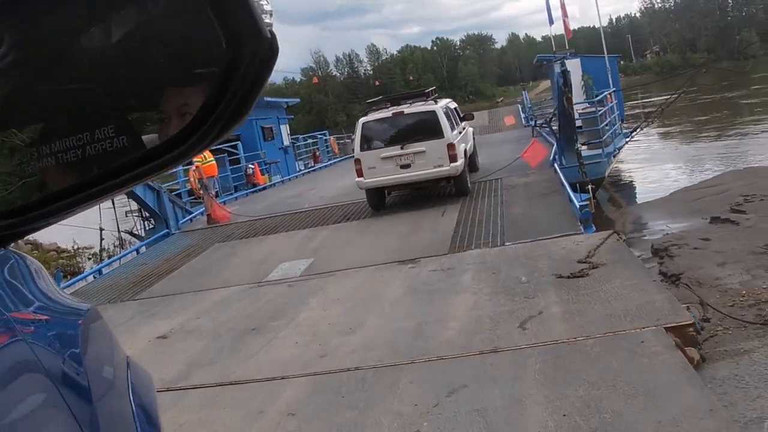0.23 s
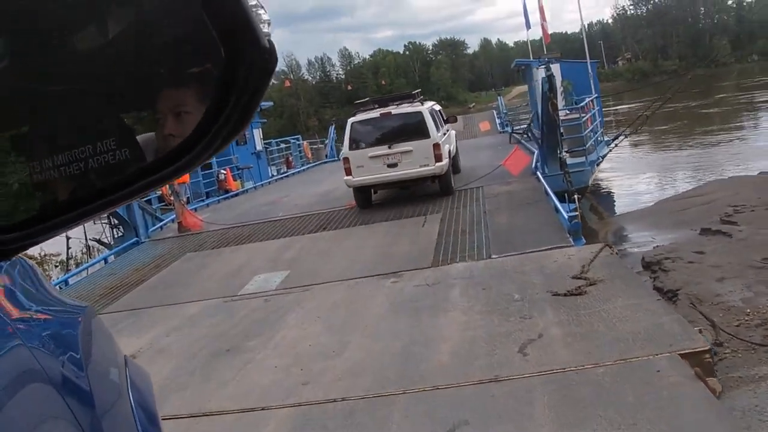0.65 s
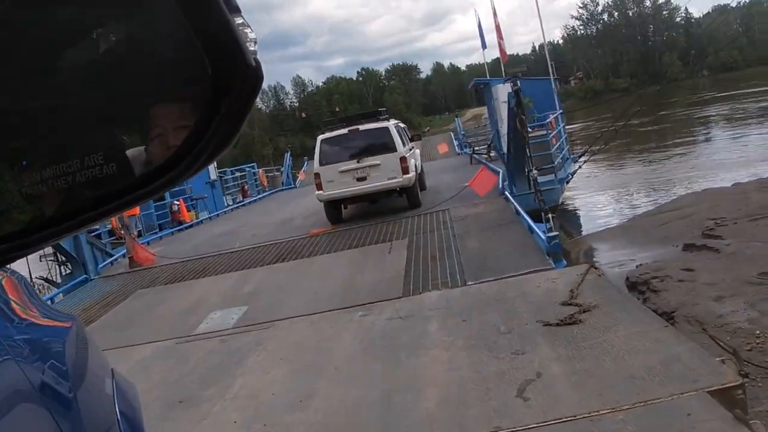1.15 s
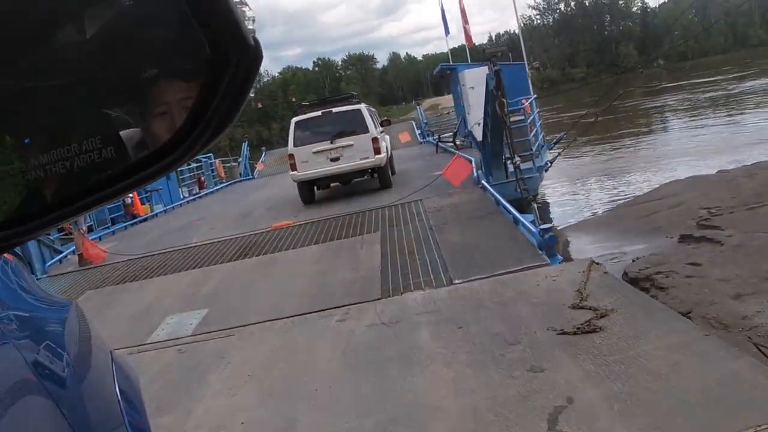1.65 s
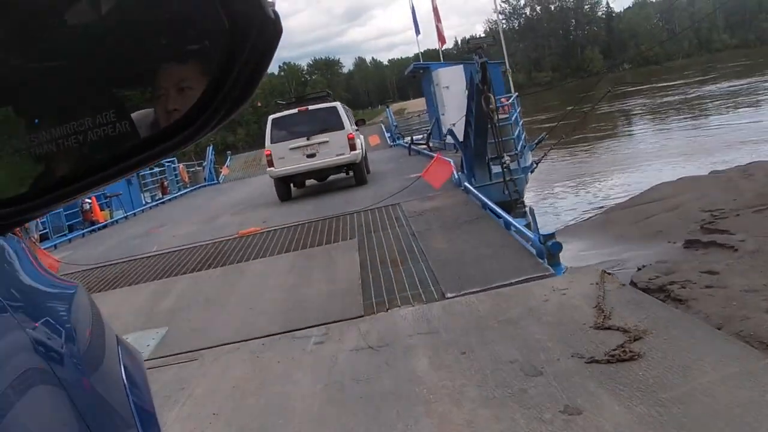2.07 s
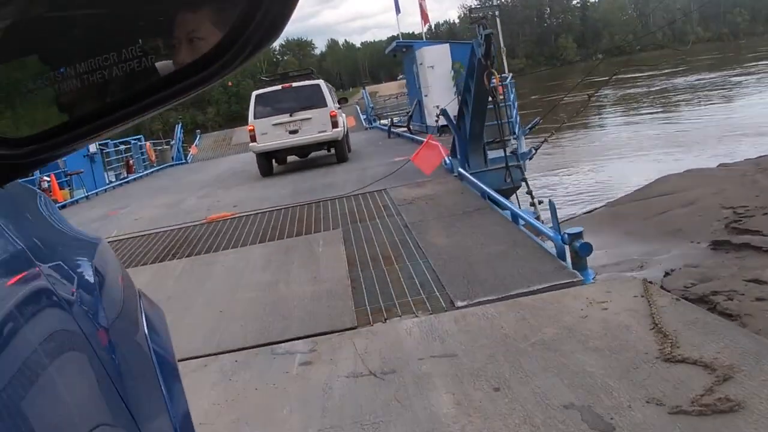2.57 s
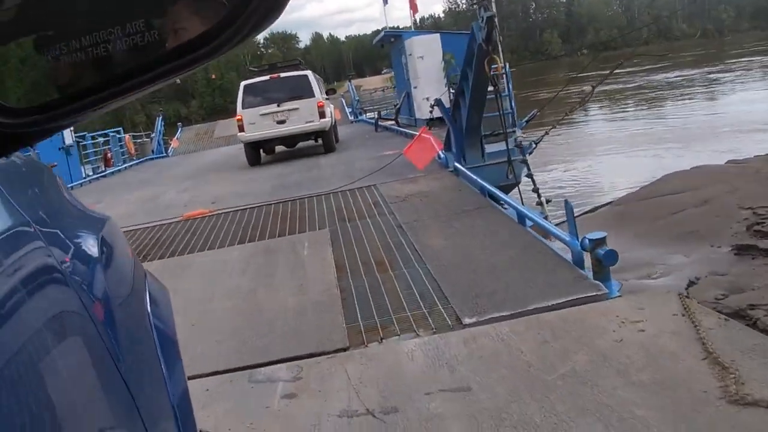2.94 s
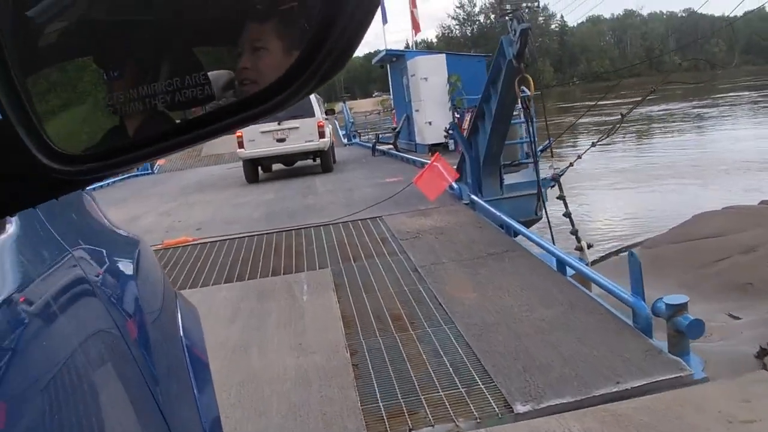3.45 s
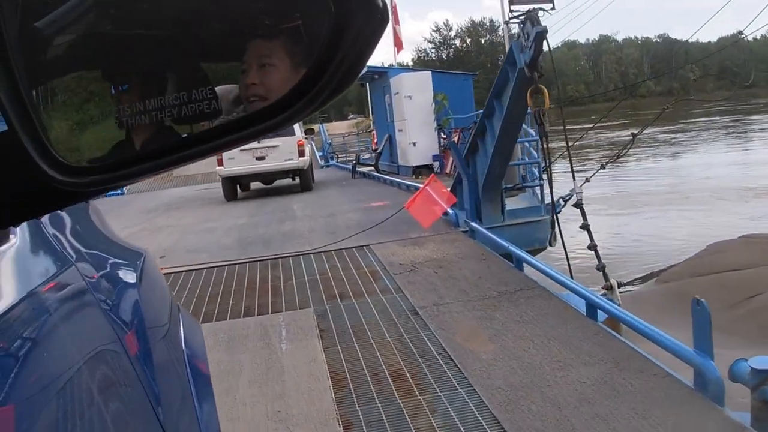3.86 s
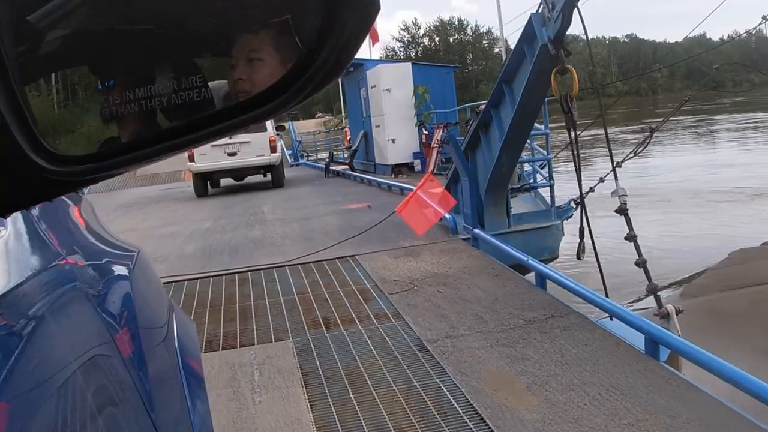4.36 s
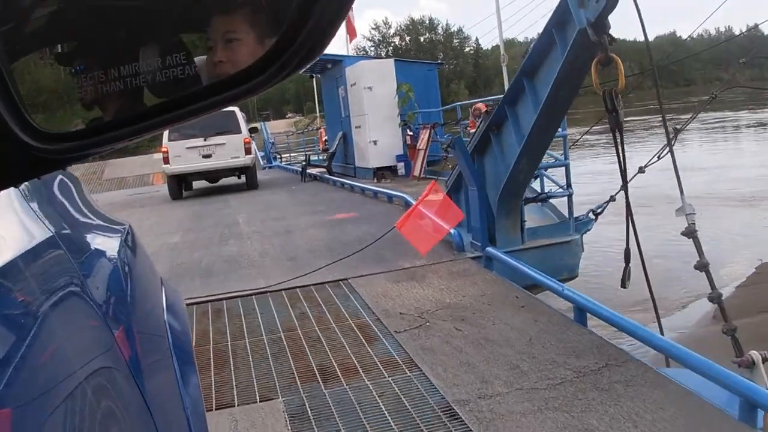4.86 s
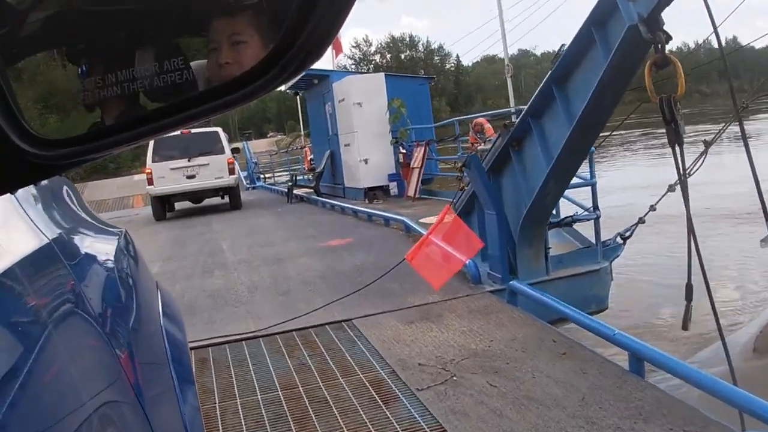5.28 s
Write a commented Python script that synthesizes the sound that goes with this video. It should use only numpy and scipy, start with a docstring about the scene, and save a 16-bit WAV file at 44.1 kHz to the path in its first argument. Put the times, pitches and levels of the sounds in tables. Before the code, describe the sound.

A car rolls slowly down a steel ferry ramp, heard from its open side window. Throughout, the ferry's diesel idles with a deep throb under low tyre rumble and a light gritty hiss. Near 0.8 seconds a tyre scuffs with a soft thud, small stones snap, and the car's engine hums a little louder. Light knocks follow at 1.5 and 1.9 seconds. At 2.3 seconds comes the loudest event: a wheel slams a loose plate, which booms, rings and bounces rapidly. Dull thuds, rattles and clinks trail on until about 3.1 seconds. Sharp taps at 4.0 seconds lead into a second, lighter and higher slam at 4.1, chattering and clinking until 4.4. The whole sound dips after each slam, then creeps back up. The car's engine eases off from about 4.5 seconds while the rolling continues, and one last jingling knock comes near 5.5 seconds.

```python
"""A car boards a river ferry

A car rolls slowly down a steel ramp, heard from its open side window. The ferry's diesel idles,
the car's engine pulls gently, and the tyres rumble, hiss and snap small stones. Twice the wheels
slam a loose ramp plate, which booms and bounces, while loose steel parts rattle and clink.
The whole sound dips after each slam and then creeps back up."""
import sys
import numpy as np
from scipy import signal
from scipy.fft import rfft, irfft
from scipy.io import wavfile
from scipy.ndimage import uniform_filter1d

SR = 44100
rng = np.random.default_rng(int(sys.argv[2]) if len(sys.argv) > 2 else 0)


def bounce(signal):
    """Save signal as a 16-bit WAV file at the path given by the first command-line argument."""
    frames = np.transpose(np.atleast_2d(signal))
    limited = np.clip(frames, -1, 1)
    pcm = np.round(limited * 32767).astype(np.int16)
    wavfile.write(sys.argv[1], SR, pcm)


N = 243652
T = np.arange(N) / SR

# the tones of the ferry's diesel: (multiple of the firing rate, level [dB])
DIESEL_TONES = [(1, 2.5), (2, -3), (3, -10.5), (4, -5.5), (5, -7), (6, -21.5), (6.5, -13), (8, -16),
                (11, -20.5), (12, -29), (17, -26), (20, -23), (21, -28), (22, -34.5), (26, -27), (30, -20)]
# a deep 39 Hz throb swells and sinks several times: (time [s], extra level [dB])
DEEP_THROB = [(0, 2), (1.9, -11), (2.9, 5), (4.75, -5.5), (5.05, 4.5), (5.38, 0.5), (5.52, 3)]
# the tones of the car's engine: (multiple of the crank speed, level [dB])
CAR_TONES = [(2, -2), (3, 3), (4, 0), (5, -1.5), (6, -7.5), (8, -11.5), (10, -14.5)]
# the driver's foot on the pedal: (time [s], crank speed [Hz], engine load [dB])
PEDAL = [(0, 24.96, -2.5), (.65, 25.28, -5.5), (.95, 26.29, 3.5), (1.3, 25.9, 7.5), (2.1, 25.48, 0),
         (3, 23.79, -8.5), (3.7, 24.92, -1.5), (4.6, 22.7, -21), (5.2, 21.5, -28)]

# the tone colour of each kind of noise: (frequency [Hz], relative level [dB])
RUMBLE_COLOUR = [(12, -32), (25, 9.5), (35, 2), (60, 1.5), (90, 6), (130, 0), (200, -19), (300, -31),
                 (600, -78)]  # the car's body
ROAR_COLOUR = [(100, -6.5), (200, 9), (270, 3.5), (350, 1.5), (440, 1), (530, -1.5), (780, -4.5),
               (850, -2.5), (930, -4.5), (1080, -5.5), (1180, -4.5), (1290, -6), (1430, -2.5), (1660, -8),
               (1900, -17.5), (2600, -46), (5000, -48.5)]  # tyres on the road
HISS_COLOUR = [(900, -57), (1500, 4.5), (2200, 2.5), (2720, 3), (3300, -2), (4000, -5.5), (5500, -10),
               (7000, -17.5), (8700, -16.5), (10100, -18.5), (11000, -26.5), (13500, -39), (15000, -59)]  # tyre hiss
SCUFF_COLOUR = [(200, -8), (430, 13), (560, -4), (680, 3), (950, -12), (1600, -10), (2300, -5), (3200, -10),
                (4500, -20), (7000, -26), (12000, -40)]  # tread dragging over grit
JINGLE_COLOUR = [(1200, -19), (2500, 14.5), (3600, 15.5), (5500, 8.5), (7500, 10.5), (9500, 11),
                 (11000, -2.5), (14500, -13)]  # small steel parts
THUD_COLOUR = [(15, -62), (33, 21), (60, -5), (100, 2.5), (150, -6.5), (250, -9), (500, -20.5), (1000, -85)]  # a wheel dropping
WASH_COLOUR = [(40, -24), (200, -11), (400, 4.5), (600, -1), (900, 0), (1200, 0), (1700, -7), (2300, -18),
               (4000, -60), (8000, -79)]  # a plate's many weak tones, blurred into a wash
# how long that wash takes to fade by 60 dB, as for all fade times: (frequency [Hz], fade time [s])
WASH_FADE = [(100, 1), (400, 0.98), (700, 0.3), (1200, 0.18), (2500, 0.15)]

# the body rumbles more on rough stretches: (time [s], level [dB])
RUMBLE_LEVEL = [(0, -31), (.7, -32.5), (1.2, -29.5), (1.8, -30.5), (2.6, -22.5), (3.2, -31.5), (3.9, -29.5),
                (4.55, -27), (5.1, -35.5), (5.52, -29.5)]
# the road roar follows the surface: (time [s], level [dB])
ROAR_LEVEL = [(0, -35.5), (1.3, -36), (2.1, -37), (3.2, -37), (3.9, -36), (4.6, -38.5), (5.52, -34)]
# a tyre scuffs over a gritty seam: (time [s], length [s], level [dB])
SCUFFS = [(0.829, 0.078, -35.5)]
# the loudest stones under the tyres: (time [s], level [dB], pitch [Hz])
STONES = [(1.021, -36, 3180), (1.31, -42, 5000), (2.714, -40.5, 7886), (3.444, -47, 8000),
          (3.582, -43, 5190), (4.896, -50, 9960)]
# dull thuds from small bumps and the first plate's last bounce: (time [s], level [dB], boom pitch [Hz])
LOW_THUDS = [(.855, -21, 107.5), (1.711, -26.5, 82), (2.62, -15, 191), (2.937, -18.5, 88.4)]

# small steel parts clinking: (time [s], level [dB], lowest tone [Hz], fade time [s])
CLINKS = [(2.619, -49, 6400, 0.17), (3.052, -53, 9740, 0.077), (4.189, -56, 9600, 0.12),
          (4.326, -50, 6500, 0.1)]
# the tones of a clink: (multiple of the lowest tone, level [dB])
CLINK_TONES = [(1, 9), (1.148, 4.5), (1.345, -5)]
# loose fittings knocking: (time [s], tap level [dB], knock level [dB], knock pitch [Hz],
# knock fade time [s], jingle level [dB], jingle fade time [s])
RATTLES = [(1.53, -37, -36, 702.4, 0.12, -66, .11), (1.862, -22.5, -32, 970, .03, -48, .04),
           (1.936, -50, -57, 1200, .085, -48, 0.12), (2.154, -50, -55, 1202, .13, -48, .14),
           (2.616, -32, -19.5, 280, 0.18, -42, 0.12), (2.621, -27, -29, 810, 0.23, -44, .1),
           (2.644, -40, -31, 790, 0.092, -53, .08), (2.937, -28, -27, 590, 0.072, -45.5, 0.068),
           (3.05, -24, -28.5, 977, .11, -42.5, .054), (3.886, -38, -46, 1400, 0.14, -50, .15),
           (4.045, -16.5, -26.5, 1370, 0.069, -41, 0.015), (4.049, -24.5, -28, 890, 0.033, -46.5, 0.056),
           (4.191, -24, -30, 1090, 0.044, -43, 0.057), (4.326, -31, -45, 720, .092, -50, .1),
           (5.456, -21, -22.5, 900, 0.024, -29.5, 0.17), (5.463, -32, -30.5, 920, 0.16, -48, 0.074)]

# the two loose plates: (wash bass cut [Hz], thud bass cut [Hz], boom pitch [Hz], boom over thud [dB])
RAMP_PLATES = [(150, 50, 75, -1.5), (440, 55, 131, 4.5)]
# the clear tones of each plate: (pitch [Hz], level [dB], fade time [s])
FIRST_PLATE_TONES = [(146, -5, 1), (198, -15, 0.62), (230, -1, 1), (256.3, 1, 0.78), (301, -4.5, 0.78),
                     (361.3, 1.5, 0.66), (403.8, -0.5, .72), (496, -4, .62), (559, -2.5, 0.58),
                     (595, -10, 0.72), (667.5, -4.5, 0.37), (830, -5.5, 0.3), (1025, -17, 0.22),
                     (1350, -19, 0.27)]
SECOND_PLATE_TONES = [(188, -19, 0.57), (238, -12, 0.92), (316.5, -9, 0.65), (385, 0, 0.53),
                      (426, -4, 0.33), (500, -1, 0.52), (575, -5, 0.82), (620, -3, .45), (700, -6, .35),
                      (821, 2, .35), (910, -7, .25)]
# slams and bounces of the plates: (time [s], clack level [dB], clack pitch [Hz],
# travel time of a 1 kHz wave through the steel [ms], ring level [dB], thud level [dB])
BLOWS = [(2.297, -3.5, 720, 1.81, -14.5, -6.5), (2.312, -3.5, 290, 5, -21.5, -16.5),
         (2.325, -4, 482, 8.7, -20, -18), (2.343, -4, 292, 6, -19.5, -20.5),
         (2.374, -8, 325, 6.4, -21, -11), (2.409, -20, 480, 4.9, -32, -24),
         (2.464, -23, 347, 5.6, -35, -36), (4.109, -8, 610, 10, -26.5, -18),
         (4.131, -16.5, 575, 10.5, -37, -31), (4.137, -11, 518, 5.4, -28.5, -23),
         (4.169, -25, 560, 6.6, -31, -30), (4.216, -18.5, 610, 11, -36, -18.5),
         (4.244, -21, 466, 9, -42, -37), (4.313, -17, 540, 7.9, -37.5, -21.5),
         (4.339, -25, 523, 13, -49, -28), (4.372, -28, 494, 5.4, -46, -32)]

CLACK_LEAD_S = .002  # the wait before a clack's treble arrives


def amp(db):
    """Turns decibels into a gain."""
    return 10 ** (np.asarray(db) / 20)


def evened(x):
    """Scales a signal to an average strength (rms) of 1."""
    return x / np.sqrt(np.mean(x ** 2) + 1e-20)


def read(points, hz):
    """Looks up a frequency table, gliding between its rows on a log scale."""
    f, value = np.transpose(points)
    return np.interp(np.log(hz + 1), np.log(f), value)


def curves(rows):
    """The columns of a time table at every sample."""
    s, *columns = np.transpose(rows)
    return [np.interp(T, s, c) for c in columns]


def add(mix, s, sound):
    """Mixes a sound in at s seconds."""
    part = mix[round(s * SR):][:len(sound)]
    part += sound[:len(part)]


def noise(gain, size=N):
    """Noise of strength 1, coloured by the function gain(Hz)."""
    f = np.fft.rfftfreq(size, 1 / SR)
    return evened(irfft(rfft(rng.standard_normal(size)) * gain(f), size))


def drift(rate_hz):
    """A random wobble of strength 1, mostly slower than rate_hz."""
    return noise(lambda f: (f > 0) / (1 + (f / rate_hz) ** 4))


def hump(f, hz, q):
    """A peak in the spectrum around hz; a higher q makes it narrower."""
    return 1 / (1 + (q * (f / hz - hz / (f + 1))) ** 2)


def fade(t, fade_s):
    """Dies away by 60 dB every fade_s seconds."""
    return np.exp(-np.log(1000) * t / fade_s)


def struck(fade_s, rise_s=.0004):
    """The quick rise and fade of a small steel part that is hit."""
    t = T[:SR // 4]
    return fade(t, fade_s) * (1 - np.exp(-t / rise_s))


def engine(hz, db, bass_db, tones, wander, flutter_db):
    """The tones of a slightly unsteady shaft, each wavering; bass_db shifts the lowest one's level."""
    turns = np.cumsum(hz * (1 + wander * drift(6))) / SR
    waves = []
    for multiple, level_db in tones:
        strength = amp(level_db + flutter_db * drift(3.3))
        waves.append(strength * np.cos(2 * np.pi * (multiple * turns + rng.random())))
    return amp(db) * (amp(bass_db) * waves[0] + sum(waves[1:])) / np.std(sum(waves))


def ferry_diesel(firing_hz=38.97, start_db=-32.5, db_per_s=.5):
    """The idling diesel grows louder as the car comes nearer; a deep throb swells and sinks."""
    throb_db, = curves(DEEP_THROB)
    level_db = start_db + db_per_s * T
    return engine(firing_hz, level_db, throb_db, DIESEL_TONES, wander=.0069, flutter_db=3)


def car_engine(crank_hz, load_db):
    """The car's engine hums louder the harder it pulls."""
    return engine(crank_hz, load_db - 33.5, bass_db=6, tones=CAR_TONES, wander=.0041, flutter_db=2.5)


def fan_and_belts(crank_hz, load_db):
    """A fluttering whirr that grows with the load and pulses with the firings, two per turn."""
    pulses = 1 + .5 * np.cos(2 * np.pi * np.cumsum(2 * crank_hz) / SR)
    level = amp(-53.5 + .47 * load_db + 1.8 * drift(17))
    return level * pulses * noise(lambda f: hump(f, hz=2730, q=6))


def rolling(lumps_db=2.03, swell_db=.73):
    """Rolling tyres make a lumpy rumble in the car's body, a roar and a hiss."""
    rumble_db, = curves(RUMBLE_LEVEL)
    roar_db, = curves(ROAR_LEVEL)
    hiss_db = -44 - .55 * T  # fades towards the ferry
    # echoes off the door and ramp lift some frequencies and weaken others
    echoes_s = rng.uniform(.00196, .027, 16)
    ripple_db = lambda f: evened(sum(np.cos(2 * np.pi * f * s) for s in echoes_s))
    swell = swell_db * drift(40)
    rumble = amp(rumble_db + lumps_db * drift(37)) * noise(lambda f: amp(read(RUMBLE_COLOUR, f)))
    roar = amp(roar_db + swell) * noise(lambda f: amp(read(ROAR_COLOUR, f) + ripple_db(f)))
    hiss = amp(hiss_db + swell) * noise(lambda f: amp(read(HISS_COLOUR, f) + ripple_db(f)))
    return rumble + roar + hiss


def scuffs(grain_db=1, grain_hz=250):
    """The tread drags over grit: a short grainy rasp over the tyre's hollow note."""
    out = np.zeros(N)
    for s, length, db in SCUFFS:
        arch = np.sqrt(np.sin(np.pi * np.arange(0, length, 1 / SR) / length))
        rub = noise(lambda f: amp(read(SCUFF_COLOUR, f)))
        rasp = evened(rub * amp(grain_db * drift(grain_hz)))
        add(out, s, amp(db) * arch * rasp[:len(arch)])
    return out


def grit(snap_s=.0022, grains_per_s=30):
    """A few stones snap under the tread among many small grains."""
    out, t = np.zeros(N), T[:SR // 32]
    draws = rng.random((400, 3))[:int(grains_per_s * T[-1])]
    grains = [(when * T[-1], -56 - 3 * np.log(softness + .03), 2000 + 4500 * pitch)
              for when, softness, pitch in draws]
    for s, db, hz in list(STONES) + grains:
        snap = noise(lambda f: hump(f, hz, q=4.5), len(t)) * np.exp(-t / snap_s)
        add(out, s, amp(db) * snap)
    return out


def jolt(bass_cut_hz, boom_hz, boom_db, thud_fade_s=.85, boom_fade_s=.58, rise_s=.0035):
    """A wheel drops: the car's body thuds and the whole plate booms under its weight."""
    t = T[:SR]
    thud = noise(lambda f: amp(read(THUD_COLOUR, f)) / np.hypot(1, (bass_cut_hz / (f + 1)) ** 2), SR)
    boom = amp(boom_db) * np.sin(2 * np.pi * boom_hz * t)
    return (thud * fade(t, thud_fade_s) + boom * fade(t, boom_fade_s)) * (1 - np.exp(-t / rise_s))


def low_thuds():
    """Dull low thuds: small bumps and the first plate's last bounce."""
    out = np.zeros(N)
    for s, db, boom_hz in LOW_THUDS:
        thud = jolt(bass_cut_hz=40, boom_hz=boom_hz, boom_db=-.5, thud_fade_s=.4, boom_fade_s=.22)
        add(out, s, amp(db) * thud)
    return out


def clinks():
    """Small shaken steel parts ring with a few high tones."""
    out = np.zeros(N)
    for s, db, hz, fade_s in CLINKS:
        peaks = lambda f: sum(amp(level) * hump(f, ratio * hz, q=32) for ratio, level in CLINK_TONES)
        clink = noise(lambda f: amp(read(JINGLE_COLOUR, f)) * peaks(f), SR // 4)
        add(out, s, amp(db) * clink * struck(fade_s))
    return out


def clack(centre_hz, travel_ms):
    """A blow sends bending waves through steel; treble outruns bass, so it makes a falling chirp."""
    f, top_hz = np.fft.rfftfreq(SR // 8, 1 / SR), 1.7 * centre_hz
    delay_s = CLACK_LEAD_S + travel_ms / 1000 * (np.sqrt(1000 / (f + 1)) - np.sqrt(1000 / top_hz))
    phase = -2 * np.pi * np.cumsum(delay_s) * f[1]
    gain = hump(f, centre_hz, q=.68) / (1 + (f / top_hz) ** 8)
    wave = irfft(gain * np.exp(1j * phase))[:SR // 16]
    return wave / abs(wave).max()


def fittings():
    """Loose steel fittings tap, giving a short dull knock and a dry bright jingle."""
    out = np.zeros(N)
    for s, tap_db, knock_db, hz, knock_fade_s, jingle_db, jingle_fade_s in RATTLES:
        knock = noise(lambda f: hump(f, hz, q=.75) / (1 + (f / (2.24 * hz)) ** 6), SR // 4)
        jingle = noise(lambda f: amp(read(JINGLE_COLOUR, f)), SR // 4)
        add(out, s - CLACK_LEAD_S, amp(tap_db) * clack(hz, travel_ms=2.7))
        add(out, s, amp(knock_db) * knock * struck(knock_fade_s))
        add(out, s, amp(jingle_db) * jingle * struck(jingle_fade_s))
    return out


def plate_ring(tones, bass_cut_hz, tones_db=-4, spread_db=2.5, detune=.008, rise_s=.007):
    """A struck plate rings with clear tones over a noisy wash whose treble dies first."""
    t = T[:SR]
    bass_cut = lambda f: 1 / np.sqrt(1 + (bass_cut_hz / (f + 1)) ** 4)
    wash = noise(lambda f: amp(read(WASH_COLOUR, f)) * bass_cut(f), SR)
    band_hz, s, bands = signal.stft(wash, SR, nperseg=512)
    bands *= fade(s, read(WASH_FADE, band_hz)[:, None])
    out = signal.istft(bands, SR, nperseg=512)[1][:SR]
    # where the wheel sits shifts each tone's strength and pitch, here by chance
    for (hz, db, fade_s), (strike, load) in zip(tones, rng.standard_normal((len(tones), 2))):
        wave = np.sin(2 * np.pi * (hz * (1 + detune * load) * t + rng.random()))
        out += amp(tones_db + db + spread_db * strike) * fade(t, fade_s) * wave
    return out * (1 - np.exp(-t / rise_s))


def plate_slams(second_plate_after_s=3.5):
    """Wheels slam a plate, which then bounces and chatters; each blow clacks, rings and thuds."""
    out = np.zeros(N)
    for s, clack_db, clack_hz, travel_ms, ring_db, thud_db in BLOWS:
        plate = int(s > second_plate_after_s)
        tones = SECOND_PLATE_TONES if plate else FIRST_PLATE_TONES
        wash_cut_hz, thud_cut_hz, boom_hz, boom_db = RAMP_PLATES[plate]
        add(out, s, amp(clack_db) * clack(clack_hz, travel_ms))
        add(out, s, amp(ring_db) * plate_ring(tones, wash_cut_hz))
        add(out, s, amp(thud_db) * jolt(thud_cut_hz, boom_hz, boom_db))
    return out


def scene():
    """Both engines, the tyres and the steel ramp, mixed into one channel."""
    crank_hz, load_db = curves(PEDAL)
    engines = ferry_diesel() + car_engine(crank_hz, load_db) + fan_and_belts(crank_hz, load_db)
    return (engines + rolling() + scuffs() + plate_slams() + low_thuds()
            + fittings() + clinks() + grit())[None]


def held(db, db_per_s):
    """Follows a rising level at once and lets it fall at a steady rate."""
    fall = T * db_per_s
    return np.maximum.accumulate(db + fall) - fall


def record(dry, threshold_db=-13, slow_share=.63, attack_s=.011, top_hz=14800):
    """Loud booms turn the level down; it returns fast at first, then slowly. The top treble is cut."""
    keep = np.exp(-1 / (attack_s * SR))
    power = signal.lfilter([1 - keep], [1, -keep], dry[0] ** 2)
    over_db = np.maximum(10 * np.log10(power + 1e-12) - threshold_db, 0)
    dip_db = np.maximum(held(over_db, db_per_s=95), held(slow_share * over_db, db_per_s=3.69))
    dipped = dry / amp(uniform_filter1d(dip_db, size=100))
    treble_cut = signal.firwin(511, top_hz, window=("kaiser", 9), fs=SR)
    return signal.oaconvolve(dipped, treble_cut[None], "same")


dry = scene()
out = record(dry)
bounce(out)
```